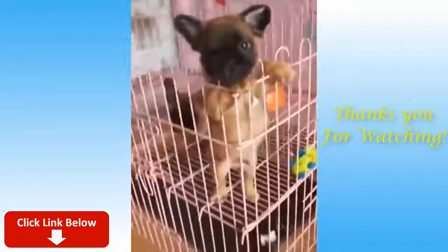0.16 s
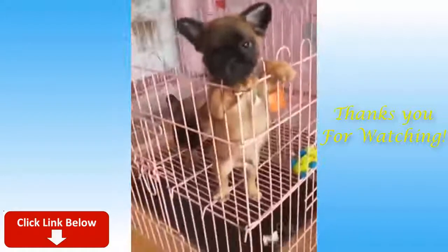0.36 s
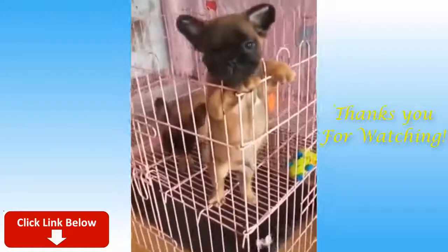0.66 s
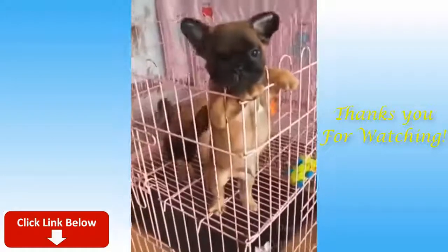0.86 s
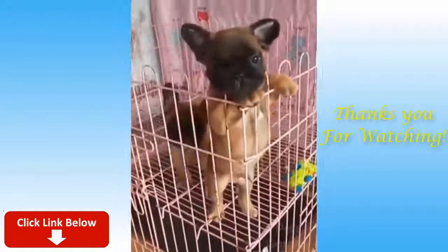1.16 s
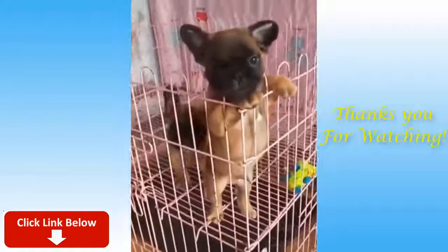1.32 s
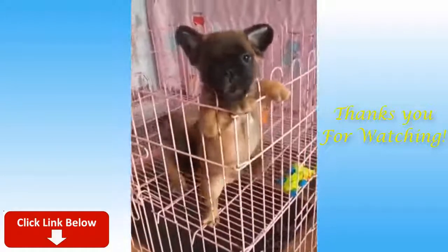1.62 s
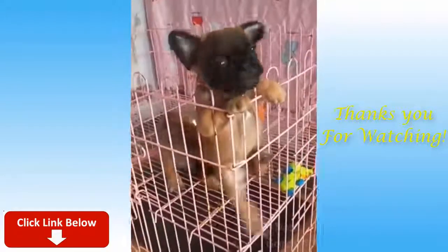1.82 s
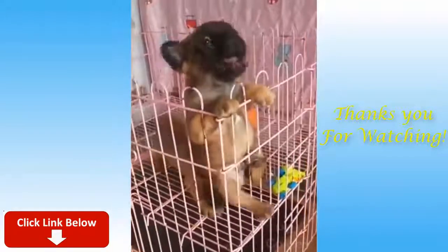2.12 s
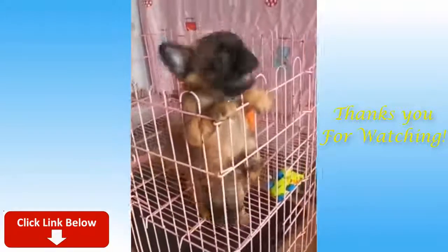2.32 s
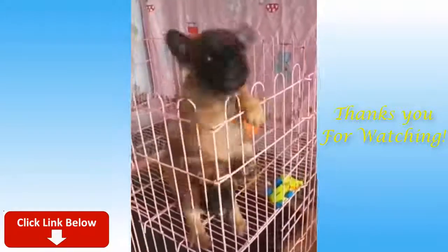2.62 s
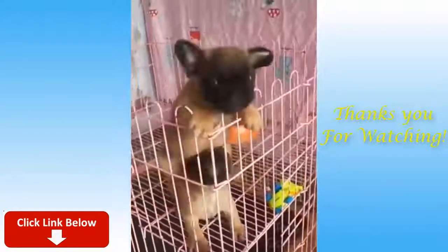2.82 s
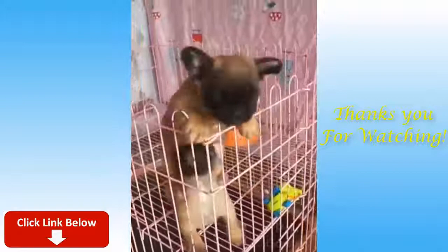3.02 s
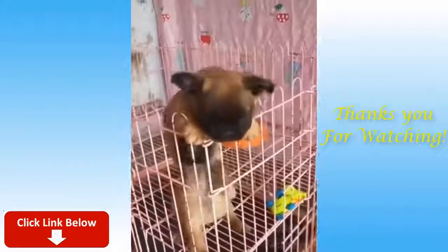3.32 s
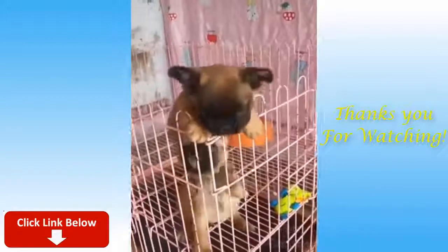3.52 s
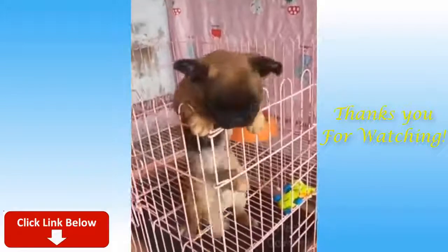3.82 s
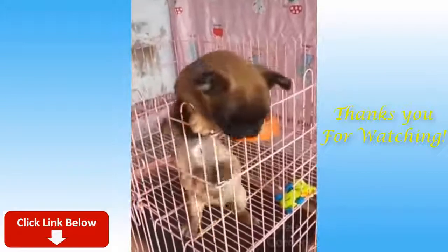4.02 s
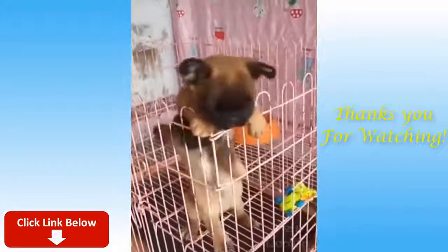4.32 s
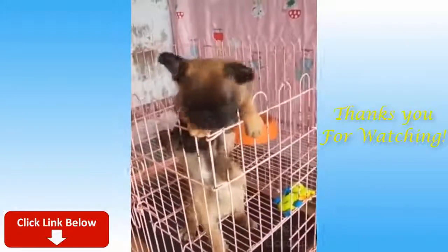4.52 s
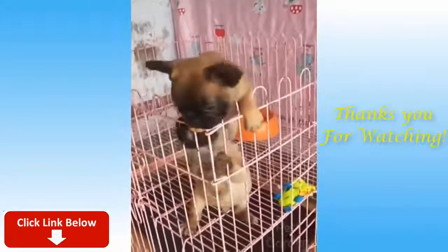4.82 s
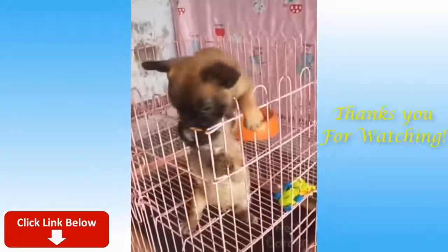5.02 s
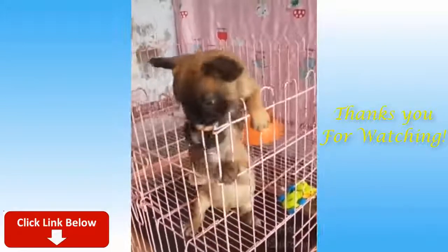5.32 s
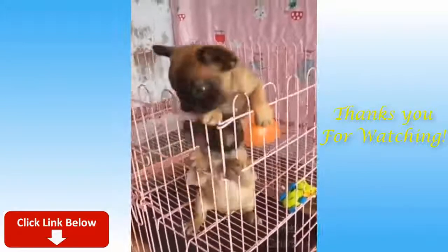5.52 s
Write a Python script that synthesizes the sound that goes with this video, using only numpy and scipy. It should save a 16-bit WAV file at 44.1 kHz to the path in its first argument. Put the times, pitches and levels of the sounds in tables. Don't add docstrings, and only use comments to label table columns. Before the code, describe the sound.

Puppy voice only: rough low groans alternate with clear high whines that glide and tremble. The loudest cries come before the middle, followed by a fading whimper, quick yips, then a sharp squealing yelp near the end. Tiny throat clicks precede some calls. Hard walls ring briefly; the near-mono phone pickup pumps and gates the faint background.

```python
import sys
import numpy as np
from scipy import signal
from scipy.io import wavfile
from scipy.ndimage import uniform_filter1d, minimum_filter1d

SR = 44100
rng = np.random.default_rng(int(sys.argv[2]) if len(sys.argv) > 2 else 0)


def wav_record(signal):
    frames = np.transpose(np.atleast_2d(signal))
    bounded = np.clip(frames, -1, 1)
    quanta = np.round(bounded * 32767).astype(np.int16)
    wavfile.write(sys.argv[1], SR, quanta)


def amplitude_ratio(level_db):
    exponent = np.asarray(level_db, float) / 20
    return 10 ** exponent


N = 249606


def evened(x):
    return x / np.sqrt(np.mean(x ** 2) + 1e-20)


def steadied(x, size=1300):
    return x / np.sqrt(abs(uniform_filter1d(x ** 2, size, mode="reflect")) + 1e-12)


def read(points, hz):
    f, value = np.transpose(points)
    return np.interp(np.log(hz + 1), np.log(f + 1), value)


def add(mix, s, sound):
    part = mix[round(s * SR):][:len(sound)]
    part += sound[:len(part)]


def wobble(size):
    smooth = uniform_filter1d(rng.standard_normal(size), 500)
    return evened(uniform_filter1d(smooth, 500))


def resonate(x, hz, width_hz):
    turn = np.exp(2j * np.pi * np.cumsum(hz * np.ones(len(x))) / SR)
    r = np.exp(-np.pi * np.mean(width_hz) / SR)
    return 2 * (turn * signal.lfilter([(1 - r) ** 2], [1, -2 * r, r * r], x / turn)).real


def folds(hz, rough):
    n = len(hz)
    cycle = np.cumsum(hz) / SR
    luck = rng.standard_normal((int(1500 * n / SR) + 2, 2))
    late, strong = (np.interp(cycle, np.arange(len(luck)), v) for v in luck.T)
    turns = cycle + .3 * rough * late
    flutter = amplitude_ratio(3.0 * rng.standard_normal((n // 700 + 2, 100)))
    at = np.arange(n) / 700
    tones = np.zeros(n)
    for k in range(1, min(100, int(15400 / hz.min()))):
        swell = np.interp(at, np.arange(len(flutter)), flutter[:, k])
        tones += swell * np.cos(2 * np.pi * k * turns) * (k * hz < 15400)
    puffs = (.3 + np.exp(-(turns % 1) / .3)) * rng.standard_normal(n)
    return evened(tones * amplitude_ratio(8 * rough * strong)) + .6 * rough * evened(puffs)


FIRST_HZ, FIRST_OPENS_HZ, SECOND_OPENS_HZ = 800, 356, 322
SECOND_DB, SECOND_OPENS_DB, EDGE_DB, EDGE_OPENS_DB = -21.5, 41, -31, 44.5
TUNED_HZ = 1030
CATCH, CATCH_S, ATTACK_S, RELEASE_S = .06, .03, .006, .0022


def call(rows, rough, shade, edge, widths_hz, chest_db, middle_db, pocket, tuned):
    s, *columns = np.transpose(rows)
    t = np.arange(s[0], s[-1], 1 / SR)
    effort_db, hz, mouth, *shift_hz = (uniform_filter1d(np.interp(t, s, c), 300) for c in columns)
    tongue_hz, bite_db, *upper_db, air_db = shade

    second_db = SECOND_DB + SECOND_OPENS_DB * mouth
    edge_db = EDGE_DB + EDGE_OPENS_DB * mouth + bite_db
    first_db = effort_db - 10 * np.log10(1 + amplitude_ratio(2 * second_db) + amplitude_ratio(2 * edge_db))
    nearest_hz = uniform_filter1d(hz * np.maximum(np.round(TUNED_HZ / hz), 1), size=600)
    first_hz = tuned * nearest_hz + (1 - tuned) * (FIRST_HZ + FIRST_OPENS_HZ * mouth)
    second_hz = tongue_hz + SECOND_OPENS_HZ * mouth + sum(shift_hz)

    hz = hz * (1 + .006 * wobble(len(t)))
    rough = rough + CATCH * np.exp(-(t - s[0]) / CATCH_S)
    drive = folds(hz, rough)

    chest = amplitude_ratio(chest_db) * evened(resonate(drive, hz, 60 + 250 * rough))
    first = steadied(resonate(drive, first_hz, widths_hz[0]))
    middle = amplitude_ratio(middle_db) * steadied(resonate(drive, 1321, 290))
    second = amplitude_ratio(second_db) * steadied(resonate(drive, second_hz, widths_hz[1]))

    upper = np.zeros(len(t))
    for k, ((f, width_hz), db) in enumerate(zip(edge, [0, *upper_db])):
        upper += (-1) ** k * amplitude_ratio(db) * resonate(drive, f, width_hz)
    pocket_hz = np.maximum(6600 - 5500 * (t - s[0]), 3700)
    upper = upper - pocket * resonate(upper, pocket_hz, 1100)

    thin = resonate(resonate(drive, 10310, 2900), 10310, 2900)
    top = resonate(resonate(drive, 15400, 3000), 12140, 3000)
    thin = amplitude_ratio(edge_db + air_db) * steadied(thin + amplitude_ratio(1 - 60 * rough) * top)

    sound = chest + first + middle - second + amplitude_ratio(edge_db) * steadied(upper) - thin
    fade = np.clip(np.minimum((t - s[0]) / ATTACK_S, (s[-1] - t) / RELEASE_S), 0, 1)
    return s[0], amplitude_ratio(first_db) * sound * fade


# t/s, effort/dB, pitch/Hz, mouth opening/0-1, second resonance shift/Hz
CRIES = [
    [(1.722, -18, 601.6, 0, -100), (1.782, -17, 607, 0.4, -150), (1.818, -18.5, 630.3, .7, -170),
     (1.91, -21.5, 617, 0.3, 0), (1.975, -16.5, 633, 0.23, 30), (2.038, -21, 673.8, 0.74, -53),
     (2.11, -18.5, 674, 0.83, 214), (2.23, -21, 601.7, 0.68, 215), (2.28, -22.5, 627, 0.68, 120)],
    [(2.472, -15, 432, 0.81, -500), (2.485, -20, 494, 0.98, -400), (2.505, -17, 550.5, 0.9, -39),
     (2.54, -17.5, 597.8, .95, 51), (2.686, -20.5, 591.3, 0.95, 100), (2.782, -16, 586, 0.86, -400),
     (2.805, -27, 717.5, 0.85, -300), (2.84, -25, 854.5, 0.8, -250), (2.88, -27, 955, 0.46, -100)],
    [(3.037, -17, 424, 0.58, -500), (3.073, -18, 447.8, 1, -500), (3.09, -20.5, 551, 0.71, -49),
     (3.133, -21, 598.4, 0.66, 272), (3.2, -18.5, 566, 0.46, 414)],
]
# t/s, effort/dB, pitch/Hz, mouth opening/0-1
YIPS = [
    [(3.198, -12.5, 1107, 1), (3.218, -20.5, 1120, 0.86), (3.274, -26.5, 967, 0.76),
     (3.36, -30, 1005, 0.49)],
    [(3.785, -29.5, 715, 0.5), (3.81, -23.5, 794, 0.27), (3.835, -19.5, 898, 0.44),
     (3.86, -22.5, 934.4, .45), (3.95, -24, 952.7, 0.53)],
    [(3.948, -19, 980, 0), (3.964, -27, 1062, 0.71), (4.0, -54, 1049, 0.6), (4.03, -32, 958, 0.1)],
    [(4.785, -37, 1127, 0.1), (4.807, -20, 1008, 0.91), (4.877, -42, 844, 0.3), (4.895, -29.5, 850, 0.23)],
    [(4.895, -27, 845, 1), (4.971, -19, 877, 1), (5.039, -29, 922.5, 0.28), (5.065, -27.5, 895, 0.3),
     (5.091, -23.5, 974.4, 0.46), (5.105, -40, 908, 0.4), (5.27, -41, 903, 0)],
]
# t/s, effort/dB, pitch/Hz, mouth opening/0-1
WHIMPERS = [
    [(0.17, -27, 1241, 0.38), (0.23, -40.5, 1199, 0.57)],
    [(1.02, -24.5, 755, 0.36), (1.176, -22.5, 733, 0.36), (1.27, -30, 743, 0.5), (1.45, -33.5, 800, 0.26),
     (1.6, -26.5, 761.7, 0.16), (1.71, -28.5, 737.5, .2)],
    [(1.58, -28.5, 888, 0.64), (1.67, -25.5, 1170, 0.46), (1.72, -29.5, 1400, .3)],
    [(2.28, -26, 612, 1), (2.31, -19.5, 930, 1), (2.345, -25.5, 1170, .8)],
    [(3.4, -33, 777, 0.53), (3.53, -45, 744, 0.52), (3.7, -57, 732, 0.091)],
    [(4.4, -27.5, 1015, .25), (4.446, -31, 1101, 0.54), (4.49, -32.5, 1135, 0.57)],
    [(5.49, -33.5, 962, 0.089), (5.57, -29.5, 990.7, 0.19), (5.66, -48, 928, .1)],
]
WHINE_ROUGH = [.005, .005, .018, .07, .018, .04, .12, .055, .2, .28, .25, .09, .6, .08, .05]
# second resonance/Hz, bite/dB, second upper/dB, third upper/dB, air above/dB
WHINE_SHADE = [(1780, 7.5, -3, -7, -24.5), (1820, 0.5, -6, -10.5, -20), (2156, -3, -13, -24.5, -9),
               (1950, -14.5, -27, -8, -35), (1885, -18.5, 20, -37, -25), (1900, -29, -3, -15, -25),
               (2210, -4, -57, -28, -15), (2067, -6, -13, -10.5, -16.5), (2210, -1.5, 2, 5, -18),
               (2050, -7.5, 32, 5, -7.5), (1930, -4, 7, -4, -13.5), (1590, 3, -10, -36, -31),
               (2130, -18, -9.5, 2, -31), (2030, -16, 2, 1, -29), (1930, -0.5, 5, -28, -3)]
# f/Hz, width/Hz
WHINE_EDGE = [(4200, 1210), (5900, 1160), (7700, 1370)]


def whines(out):
    for rows, rough, shade in zip(CRIES + YIPS + WHIMPERS, WHINE_ROUGH, WHINE_SHADE):
        add(out, *call(rows, rough, shade, WHINE_EDGE, widths_hz=(600, 700),
                       chest_db=-8.5, middle_db=-38, pocket=0, tuned=0.89))


# t/s, effort/dB, pitch/Hz, mouth opening/0-1
GROANS = [
    [(0.0, -26.5, 237.2, 0.42), (0.092, -26, 241.7, 0.31), (0.19, -37.5, 234.6, 0.28)],
    [(0.925, -38, 263.6, 0.42), (0.957, -32.5, 249.6, 0.19), (1.007, -23, 271.6, 0.28),
     (1.113, -27, 249.5, 0.13), (1.223, -22, 238, 0.23), (1.377, -23, 279.4, 0.39),
     (1.557, -22, 296.7, 0.38), (1.71, -28, 332.7, 0.36)],
    [(3.757, -33, 242, 0.41), (3.769, -27, 244.3, 0.52), (3.81, -24, 262, 0.16)],
    [(4.293, -37, 157.3, 0.67), (4.327, -28.5, 268.3, 0.47), (4.481, -31, 280.1, 0.46),
     (4.49, -45, 297, 0.38)],
    [(4.772, -30.5, 446.5, .8), (4.786, -18.5, 446, 0.66), (4.828, -24.5, 453.6, 0.98),
     (4.92, -26.5, 414.4, 0.61)],
    [(5.313, -28.5, 184.2, .3), (5.37, -28.5, 250, 0.41), (5.425, -27, 325, 0.45), (5.56, -26.5, 334, 0.37)],
]
GROAN_ROUGH = [.4, .38, .4, .14, .35, .08]
# second resonance/Hz, bite/dB, second upper/dB, third upper/dB, air above/dB
GROAN_SHADE = [(2104, 0, 0, -5, -20), (1970, -0.5, 30, 18.5, -13.5), (1950, -18, 7.5, 2, -23),
               (1980, -18, 33, 22, -31), (1930, 3, -22, -5.5, -25), (1970, -14, 16, -12, -1)]
# f/Hz, width/Hz
GROAN_EDGE = [(3900, 1300), (5800, 1270), (8200, 480)]


def groans(out):
    for rows, rough, shade in zip(GROANS, GROAN_ROUGH, GROAN_SHADE):
        add(out, *call(rows, rough, shade, GROAN_EDGE, widths_hz=(420, 650),
                       chest_db=-13.5, middle_db=-17.5, pocket=1.0, tuned=0))


# t/s, level/dB, f/Hz
SQUEAL = [
    (4.774, -19, 1795),
    (4.822, -7.5, 2271),
    (4.862, -16.5, 2239),
    (4.887, -14, 2130),
    (4.958, -28.5, 2085),
]
# offset/Hz, level/dB
SIDEBANDS = [(-860, -15), (860, -6)]


def squeal():
    s, db, hz = np.transpose(SQUEAL)
    t = np.arange(s[0], s[-1], 1 / SR)
    hz = np.interp(t, s, hz) * (1 + .008 * wobble(len(t)))
    line = amplitude_ratio(3 * wobble(len(t))) * np.sin(2 * np.pi * np.cumsum(hz) / SR)
    sides = np.zeros(len(t))
    for offset_hz, side_db in SIDEBANDS:
        level = amplitude_ratio(side_db + 6.4 * wobble(len(t)))
        sides += level * np.sin(2 * np.pi * np.cumsum(hz + offset_hz) / SR)
    locked = np.clip((t - 4.85) / .03, .1, 1)
    level = amplitude_ratio(np.interp(t, s, db) - 3.5) * signal.windows.tukey(len(t), .08)
    return s[0], level * (line + locked * sides)


# t/s, peak level/dB, low ring f/Hz, high ring f/Hz, high ring relative level/dB
CLICKS = [(0.873, -45, 1100, 2000, -10), (0.921, -34, 870, 1900, -2), (3.203, -18.5, 1060, 2300, 3),
          (3.668, -34.5, 735, 2260, -22), (3.743, -28.5, 836, 1930, -7.5), (3.764, -24, 996, 2080, -7),
          (4.262, -34.5, 1020, 2190, -5), (4.296, -28.5, 980, 2220, -5), (4.597, -36.5, 2500, 3250, -2.5),
          (4.761, -32, 1350, 1930, 4), (5.317, -30.5, 860, 1950, 4.5), (5.566, -16.5, 1027, 1970, -19)]


def clicks(out):
    t = np.arange(600) / SR
    for s, db, low_hz, high_hz, high_db in CLICKS:
        rings = np.sin(2 * np.pi * low_hz * t) + amplitude_ratio(high_db) * np.sin(2 * np.pi * high_hz * t)
        add(out, s, amplitude_ratio(db - 6) * rings * (t / 0.00041) * np.exp(1 - t / 0.0014))


def puppy():
    out = np.zeros(N)
    whines(out)
    groans(out)
    add(out, *squeal())
    clicks(out)
    return out


# f/Hz, t60/s
ROOM = [(250, 0.37), (700, 0.63), (1800, 0.59), (4500, 0.79), (10000, 0.51)]


def room(x):
    taps = np.zeros(SR)
    at = np.arange(200, SR - 20, 20)
    taps[at + rng.integers(0, 20, len(at))] = rng.choice([-1., 1.], len(at))
    hz, t, z = signal.stft(taps, SR, nperseg=256)
    tail = signal.istft(z * amplitude_ratio(-60 * t / read(ROOM, hz)[:, None]), SR, nperseg=256)[1]
    return signal.fftconvolve(x, tail / np.linalg.norm(tail))[:N]


# f/Hz, density/dB per Hz
HUM = [(30, -49), (70, -4), (170, 0), (260, -10.5), (600, -19), (2500, -27), (7000, -35), (15000, -49.5)]
# t/s, level/dB
AIR = [(0, -42), (.2, -54), (0.398, -52.5), (0.548, -67.5), (.8, -63), (1.1, -52), (1.65, -52.5),
       (2.122, -71), (2.23, -75.5), (2.46, -56), (2.7, -72), (2.98, -47.5), (3.12, -65), (3.48, -53.5),
       (4.699, -54.5), (4.88, -58.5), (5.25, -52.5), (5.66, -50.5)]


def air():
    frames, hz = N // 256 + 5, np.fft.rfftfreq(1024, 1 / SR)
    a, b, patches = rng.standard_normal((frames, 513, 3)).T
    patches = evened(uniform_filter1d(uniform_filter1d(patches, 8, 0), 10, 1))
    patch_db = np.where(hz > 240, 3.5, 1.5)[:, None] * patches
    z = (a + 1j * b) * amplitude_ratio(read(HUM, hz)[:, None] + patch_db)

    def part(keep):
        return evened(signal.istft(z * keep[:, None], nperseg=1024, noverlap=768)[1][:N])

    hiss, rumble = part(hz > 240), part(hz <= 240)
    return amplitude_ratio(np.interp(np.arange(N) / SR, *np.transpose(AIR))) * (hiss + rumble)


def scene():
    voice = puppy()
    return np.tile(amplitude_ratio(-4.5) * voice + amplitude_ratio(-8.5) * room(voice) + air(), (2, 1))


THRIFT_DB, MOOD_DB = -47.5, 13


def gate(x):
    hz, t, z = signal.stft(x, SR, nperseg=1024, noverlap=768)
    power = uniform_filter1d(uniform_filter1d(abs(z) ** 2, 4, 0), 5, 1)
    band_db = 10 * np.log10(power + 1e-20)
    loudest_db = band_db.max(0)
    near_db = -minimum_filter1d(-band_db, 36, 0) - 33.5
    kept = np.clip((band_db - np.maximum(near_db, loudest_db - 69)) / 4, 0, 1)

    band, block = np.arange(len(hz)) // 18, np.arange(len(t)) // 4
    blocks, bands = block[-1] + 1, band[-1] + 1
    mood = uniform_filter1d(rng.standard_normal((blocks, bands)), size=3, axis=0)
    mood = mood + 0.87 * rng.standard_normal((blocks, 1))
    wide_db = uniform_filter1d(band_db, size=18, axis=0)[np.minimum(band * 18 + 9, 512)]
    wide_db = wide_db[:, np.minimum(block * 4 + 2, len(t) - 1)]
    margin_db = wide_db - loudest_db - THRIFT_DB + MOOD_DB * mood[block][:, band].T
    margin_db = margin_db + 17.0 * (hz[:, None] < 8800)
    lost = np.clip(-margin_db / 2, 0, 1) * (hz[:, None] > 6800)

    z = z * amplitude_ratio(-28 * (1 - kept) - 23 * lost)
    gated = signal.istft(z, SR, nperseg=1024, noverlap=768)[1][:N]
    return signal.oaconvolve(gated, signal.firwin(255, 15450, fs=SR), "same")


def roll_off(x):
    return signal.sosfilt(signal.butter(12, 15690, fs=SR, output="sos"), x)


def record(dry):
    gated = gate(dry[0])
    grit = np.diff(resonate(gated, 3600, 9000) * rng.standard_normal(N), prepend=0)
    slip = np.roll(gated, 900) * evened(uniform_filter1d(rng.standard_normal(N), size=400))
    side = amplitude_ratio(-40.5) * grit + amplitude_ratio(-43.5) * slip
    return roll_off(gated + np.outer([1, -1], side))


dry = scene()
out = record(dry)
wav_record(out)
```